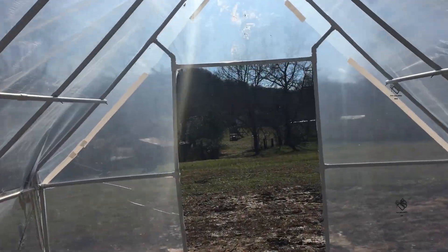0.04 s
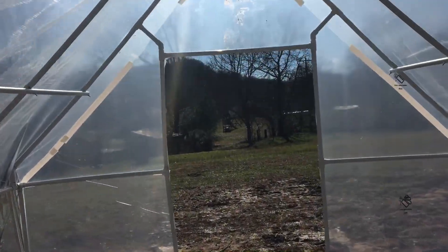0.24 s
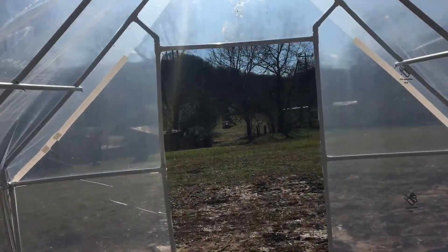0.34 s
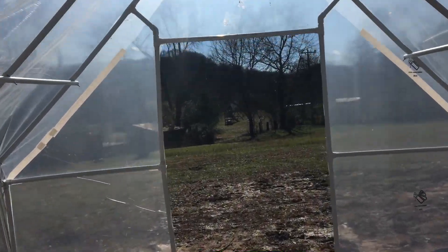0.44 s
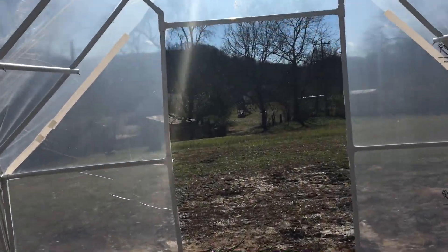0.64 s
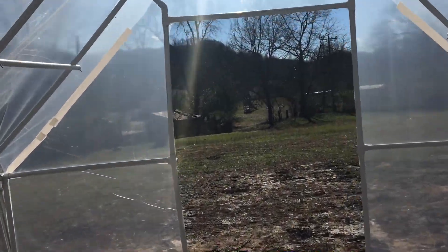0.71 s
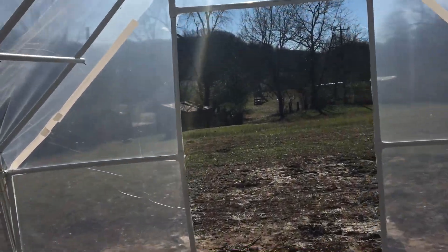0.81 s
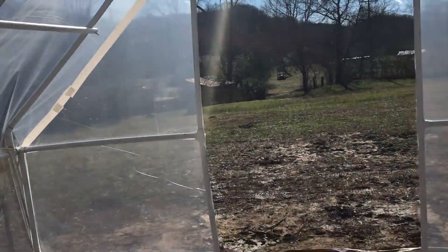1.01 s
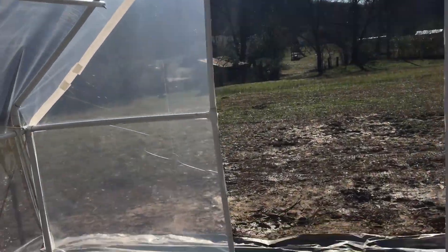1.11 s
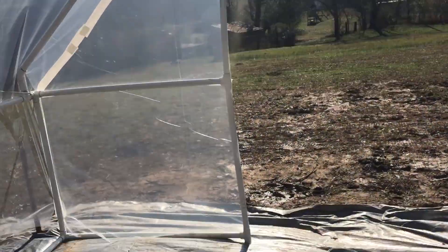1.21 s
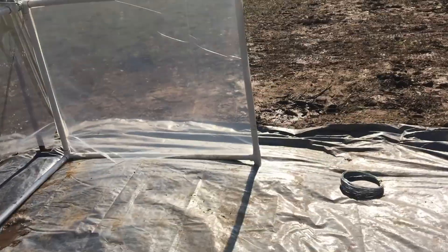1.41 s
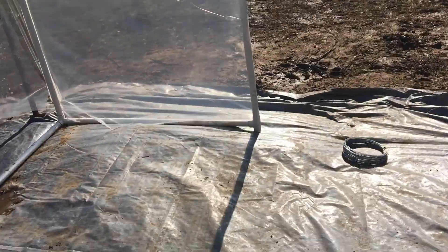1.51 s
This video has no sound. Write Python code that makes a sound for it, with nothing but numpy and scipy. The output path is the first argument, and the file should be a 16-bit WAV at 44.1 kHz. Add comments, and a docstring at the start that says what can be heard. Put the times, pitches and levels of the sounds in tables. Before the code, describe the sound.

Plastic greenhouse sheeting crinkles right at the start, heard from inside, with small sharp snaps and a fine fizzing tail. Wind rumbles and thumps on the microphone, strongest from 0.3 to 0.7 seconds. The sheet crackles again around 0.6 seconds, then slack folds rustle dully. A softer crinkle with a papery rub comes from about 1.2 to 1.4 seconds as the buffeting eases. Faint distant wind lies underneath.

```python
"""The plastic skin of a greenhouse crinkles in the wind, heard from inside.
Each gust drags the sheet into a surge of buckling creases, with a finer fizz that lingers.
Single creases snap, slack folds rustle dully, and a taut panel rubs on its frame in the last gust.
Air through the open door buffets the microphone, over a quiet bed of distant wind."""
import sys
import numpy as np
from scipy import signal
from scipy.fft import rfft, irfft
from scipy.io import wavfile
from scipy.ndimage import uniform_filter1d

SR = 44100
rng = np.random.default_rng(int(sys.argv[2]) if len(sys.argv) > 2 else 0)


def transcribe(signal):
    """Save signal, clipped to [-1, 1], as a 16-bit WAV file at the path in sys.argv[1]."""
    frames = np.atleast_2d(signal).T
    limited = np.clip(frames, -1, 1)
    pcm = np.round(limited * 32767).astype(np.int16)
    wavfile.write(sys.argv[1], SR, pcm)


N = 68355
T = np.arange(N) / SR

# Surges of the sheet, a crinkle and a fizz tail each (start [s], hold [s], crinkle level [dB],
# crinkle decay [s], crinkle centre [Hz], crinkle width [x centre], fizz level [dB], fizz decay [s])
SHEET_SURGES = [(0.004, 0.042, -48.5, 0.018, 1620, 1.3, -52.5, 0.057),
                (0.057, 0.04, -45.5, 0.04, 1950, 1.46, -52.5, 0.15),
                (0.536, 0.028, -51.5, 0.038, 2140, 1.22, -57, 0.13),
                (0.600, 0.013, -43.5, 0.037, 1730, 1.07, -49, 0.15),
                (1.111, 0.034, -85, 0.013, 1300, 1.1, -61, 0.046),
                (1.171, 0.017, -50, 0.013, 1480, 1.17, -55.5, 0.19),
                (1.225, 0.015, -52.5, 0.03, 2130, 1.3, -58, 0.27),
                (1.333, 0.016, -53, 0.034, 1500, 1.25, -60.5, 0.28)]
def crinkles():
    """Creases buckle in dense clusters as each gust drags the sheet."""
    out = 0
    for start, hold, db, decay, hz, width, _, _ in SHEET_SURGES:
        grains = resonate(clicks(per_s=2200, spread_db=1.5), hz, width)
        swell = undb(db) * envelope(start, hold, decay, attack_s=0.0044)
        out = out + swell * steady(grains, span_s=0.012)
    return out


# Tone of the film's fizz and of its cracks (frequency [Hz], level [dB])
FILM_SPECTRUM = [(400, 16), (1200, 9), (2000, 8), (2900, 5.5), (3900, 5.5), (5000, 3.5), (6800, 4.5),
                 (8000, 0), (9400, 2), (10300, -4.5), (12000, -2.5), (15500, -11)]
def fizz():
    """Much finer, brighter grains linger after each surge while the film slides."""
    extra_hold_s = 0.039
    power = sum((undb(db) * envelope(start, hold + extra_hold_s, decay, attack_s=0.011)) ** 2
                for start, hold, *_, db, decay in SHEET_SURGES)
    return np.sqrt(power) * colour(clicks(per_s=14000, spread_db=2), FILM_SPECTRUM)


# Crease hits (time [s], ring level [dB], ring pitch [Hz], ring decay [s], crack against ring [dB])
CREASE_SNAPS = [(0.0640, -36, 1770, 0.0027, -6), (0.1130, -32, 1060, 0.002, -11),
                (0.1426, -31, 1460, 0.0016, -15), (0.4700, -51, 4120, 0.0018, -10),
                (0.5341, -36.5, 1800, 0.00088, -7), (0.5670, -33, 810, 0.0011, -14.5),
                (0.6020, -33.5, 1430, 0.0023, -12), (0.6117, -33.5, 1570, 0.0014, -23),
                (0.9801, -41, 1700, 0.00062, -11), (1.1340, -54, 3900, 0.00054, -1),
                (1.181, -41.5, 1570, 0.0054, -5), (1.2296, -33.5, 1960, 0.003, -13)]
def snaps():
    """A crease flips: a short crack in the colour of the film and a few cycles of ring."""
    crack_decay_s = 0.002
    out = 0
    for start, db, hz, decay, crack_db in CREASE_SNAPS:
        age = np.maximum(T - start, 0)
        ring = np.sin(2 * np.pi * hz * age) * np.exp(-age / decay)
        crack = (T > start) * noise(FILM_SPECTRUM) * np.exp(-age / crack_decay_s)
        out = out + undb(db) * (ring + undb(crack_db) * crack)
    return out


# Dull rustles of slack folds (start [s], hold [s], level [dB], centre [Hz])
FOLD_RUSTLES = [(0.263, 0.042, -59.5, 1110), (0.348, 0.022, -53, 890), (0.386, 0.0088, -49.5, 1110),
                (0.495, 0.019, -61.5, 910), (0.792, 0.024, -58.5, 1510), (0.952, 0.044, -65, 740),
                (1.025, 0.024, -57, 880), (1.059, 0.044, -59, 560)]
def folds():
    """Slack folds shift with a soft, low rustle."""
    out = 0
    for start, hold, db, hz in FOLD_RUSTLES:
        grains = resonate(clicks(per_s=3000, spread_db=7.0), hz, width=0.88)
        swell = undb(db) * envelope(start, hold, decay_s=0.012, attack_s=0.003)
        out = out + swell * steady(grains, span_s=0.02)
    return out


# Body of the taut panel (centre [Hz], width [x centre], relative level [dB])
PANEL_RESONANCES = [(1360, 0.28, -2.5), (2020, 0.31, -0.5), (3890, 0.29, -1.5)]
def panel():
    """A taut panel rubs on its frame in the last gust; small slips excite its papery resonances."""
    slips = clicks(per_s=1200, spread_db=1.5)
    body = sum(undb(db) * resonate(slips, hz, width) for hz, width, db in PANEL_RESONANCES)
    return undb(-60) * envelope(start_s=1.17, hold_s=0.23, decay_s=0.13, attack_s=0.0067) * body


def greenhouse(x):
    """The film walls add a short, thin wash of reflections."""
    t60_s, predelay_s, wet_db = 0.52, 0.0035, -9.5
    tail = rng.standard_normal(N) * (T > predelay_s) * np.exp(-np.log(1000) * T / t60_s)
    tail /= np.sqrt(np.sum(tail ** 2))
    return x + undb(wet_db) * signal.fftconvolve(x, tail)[:N]


# Level ride of the wind on the microphone (time [s], level [dB])
WIND_RIDE = [(0, -45.5), (.035, -47.5), (.145, -51.5), (.21, -39), (.252, -52), (.32, -36.5), (.41, -28),
             (.485, -34), (.515, -41.5), (.62, -38), (.695, -36), (.725, -43), (.78, -40), (.84, -57.5),
             (.94, -42.5), (.99, -58), (1.03, -50.5), (1.14, -58.5), (1.18, -41.5), (1.21, -49.5),
             (1.245, -43), (1.295, -60), (1.335, -39.5), (1.39, -56.5), (1.435, -53), (1.48, -67),
             (1.55, -59)]
# Tone of the deep rumble (frequency [Hz], level [dB])
RUMBLE_SPECTRUM = [(15, -53), (28, -12), (45, 3.5), (65, 5), (90, -7), (120, -12), (170, -27), (300, -31),
                   (800, -75), (4000, -110)]
# Tone of the small eddies that join in strong wind (frequency [Hz], level [dB])
EDDY_SPECTRUM = [(60, -17), (110, 3), (150, 0.5), (210, -11), (350, -26.5), (600, -22), (1500, -53),
                 (6000, -102)]
# Puffs that thump the microphone (time [s], peak [dB], pitch [Hz], half length [s])
PUFF_HITS = [(0.357, -36, 157, 0.0067), (0.407, -22.5, 88, 0.012), (0.444, -26.5, 318, 0.0013),
             (0.462, -25.5, 141, .007), (0.482, -24, 62.6, 0.022), (0.652, -27, 143.5, 0.0048),
             (0.693, -15.5, 73, 0.0068), (0.694, -28, 222, 0.0025), (0.930, -44, 134, 0.0095),
             (0.960, -39.5, 207, 0.0017), (1.380, -54.5, 150, 0.011), (1.443, -48.5, 166, 0.012)]
def buffeting():
    """Turbulence at the microphone: a rumble, small eddies that grow faster than it, and single puffs."""
    strong_wind_db, strong_eddy_db, eddy_growth = -28.5, -39, 1.37
    wind_db = np.interp(T, *np.array(WIND_RIDE).T)
    eddy_db = strong_eddy_db + eddy_growth * (wind_db - strong_wind_db)
    rumble = undb(wind_db) * steady(noise(RUMBLE_SPECTRUM), span_s=0.0306)
    eddies = undb(eddy_db) * steady(noise(EDDY_SPECTRUM), span_s=0.0406)
    puffs = 0
    for at, db, hz, half_length in PUFF_HITS:
        swell = undb(db) * np.exp(-((T - at) / half_length) ** 2)
        puffs = puffs + swell * np.cos(2 * np.pi * (hz * (T - at) + rng.random()))
    return rumble + eddies + puffs


# Tone of the outdoor bed (frequency [Hz], level [dB])
FIELD_SPECTRUM = [(20, -17), (60, -7), (170, -0.5), (260, -3.5), (360, -1.5), (500, -16.5), (800, -12),
                  (1300, -13), (2000, -16), (3000, -21.5), (5000, -24), (9000, -29.5), (10500, -31),
                  (15500, -32.5)]
def outdoors():
    """Distant wind over the field: the lows waver gently, the hiss stays smooth."""
    level_db, waver_db, crossover_hz = -57.5, 2.33, 980
    air = noise(FIELD_SPECTRUM)
    lows = signal.sosfiltfilt(signal.butter(2, crossover_hz, fs=SR, output="sos"), air)
    hiss = air - lows
    return undb(level_db) * (hiss + lows * undb(waver_db * wander(rate_hz=27)))


def undb(db):
    """Decibels to gain."""
    return 10 ** (np.asarray(db) / 20)


def unit(x):
    """Scale to rms 1."""
    return x / np.sqrt(np.mean(x ** 2) + 1e-20)


def colour(x, spectrum):
    """EQ through (frequency [Hz], level [dB]) points; rms 1."""
    hz, db = np.array(spectrum).T
    bin_hz = np.maximum(np.arange(N // 2 + 1) * SR / N, 1)
    gain = undb(np.interp(np.log(bin_hz), np.log(hz), db))
    return unit(irfft(rfft(x) * gain, N))


def noise(spectrum):
    """Noise with the given tone; rms 1."""
    return colour(rng.standard_normal(N), spectrum)


def resonate(x, hz, width):
    """A resonant band of the sheet, its width a share of the centre, with steep skirts; rms 1."""
    edge = np.sqrt(1 + (width / 2) ** 2) + width / 2
    band = [hz / edge, min(hz * edge, SR / 2 - 1)]
    peak = signal.sosfilt(signal.butter(1, band, "band", fs=SR, output="sos"), x)
    return unit(signal.sosfilt(signal.butter(2, band, "band", fs=SR, output="sos"), peak))


def wander(rate_hz):
    """Smooth random drift; rms 1."""
    span = max(int(SR / rate_hz), 1)
    drift = uniform_filter1d(rng.standard_normal(N), span, mode="wrap")
    return unit(uniform_filter1d(drift, span, mode="wrap"))


def steady(x, span_s):
    """Hold the short-term power of a noise near 1."""
    power = uniform_filter1d(x ** 2, max(int(span_s * SR), 2))
    return x / np.sqrt(power + 1e-6)


def clicks(per_s, spread_db):
    """Random tiny bucklings: many weak, a few strong."""
    size = undb(spread_db * np.minimum(rng.exponential(size=N), 4))
    fires = rng.random(N) < per_s / SR
    return fires * size * np.sign(rng.standard_normal(N))


def envelope(start_s, hold_s, decay_s, attack_s):
    """Linear attack, hold counted from the start, exponential decay."""
    rise = np.clip((T - start_s) / attack_s, 0, 1)
    return rise * np.exp(-np.maximum(T - start_s - hold_s, 0) / decay_s)


def scene():
    """Mono mix: the sheet with its reflections, dry fizz, wind on the microphone and the field beyond."""
    sheet = greenhouse(crinkles() + folds() + snaps() + panel())
    return (sheet + fizz() + buffeting() + outdoors())[None]


def record(dry):
    """A low cut drops the deepest rumble and a steep high cut trims the top."""
    low_cut_hz, high_cut_hz = 22, 15680
    thinned = signal.sosfilt(signal.butter(2, low_cut_hz, "high", fs=SR, output="sos"), dry)
    return signal.sosfilt(signal.ellip(12, .2, 80, high_cut_hz, fs=SR, output="sos"), thinned)


dry = scene()
out = record(dry)
transcribe(out)
```